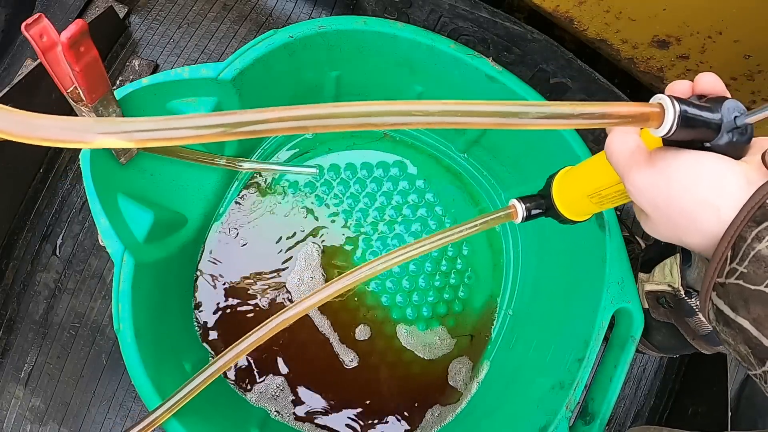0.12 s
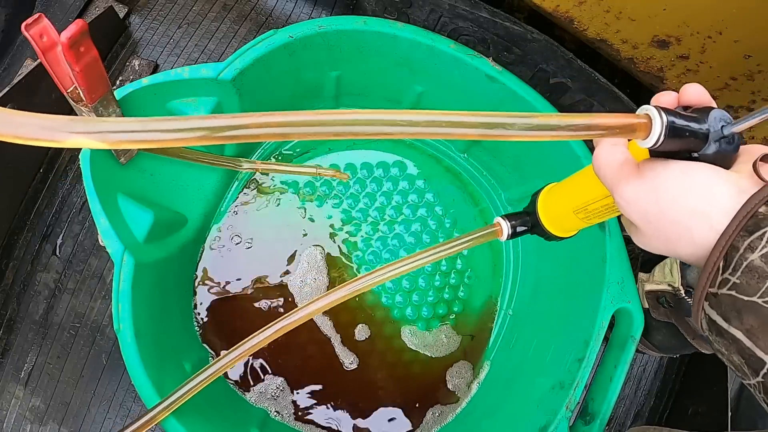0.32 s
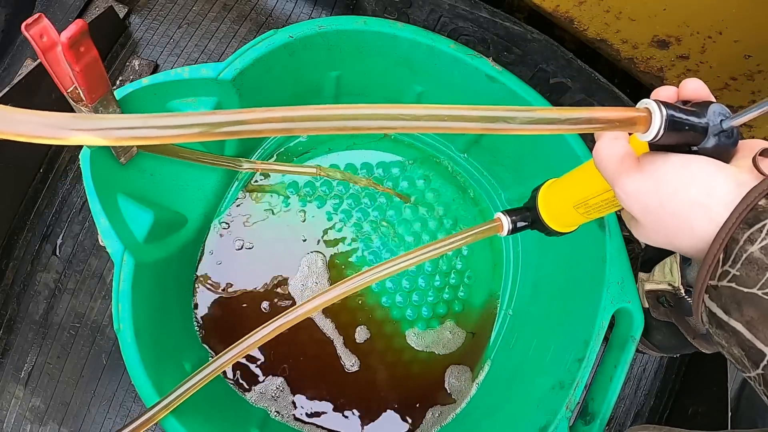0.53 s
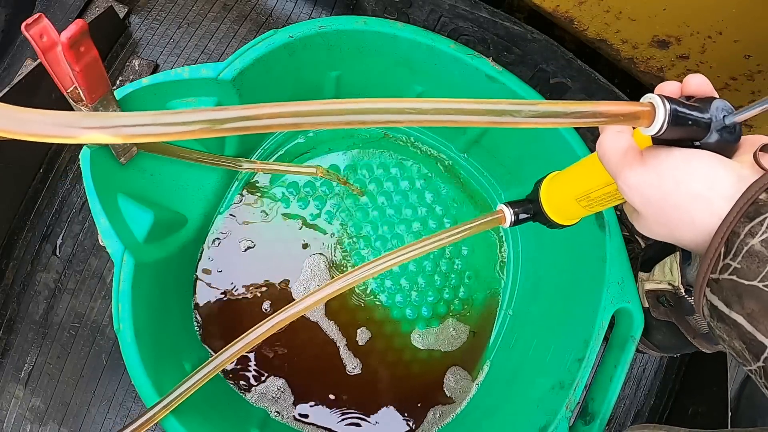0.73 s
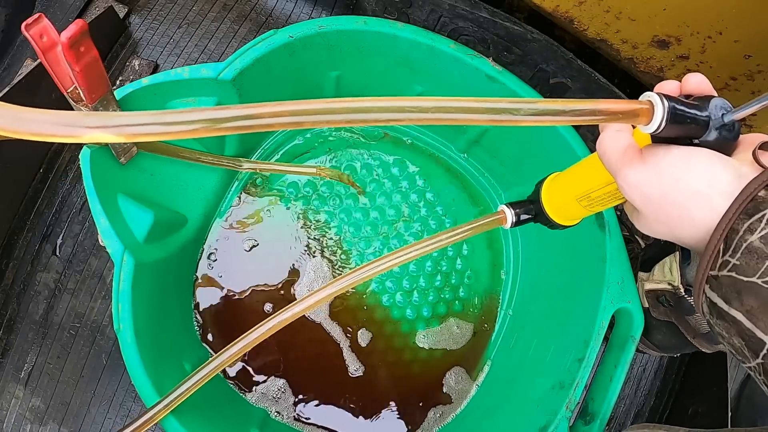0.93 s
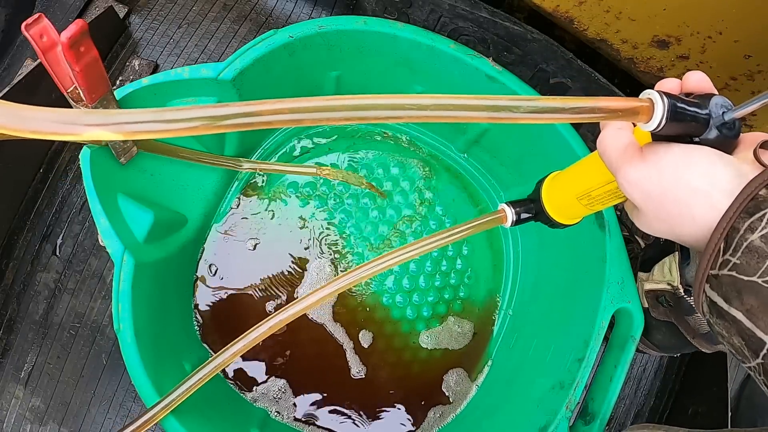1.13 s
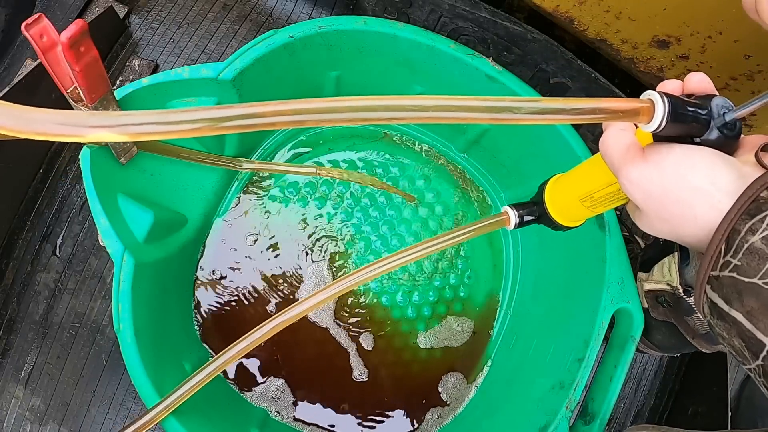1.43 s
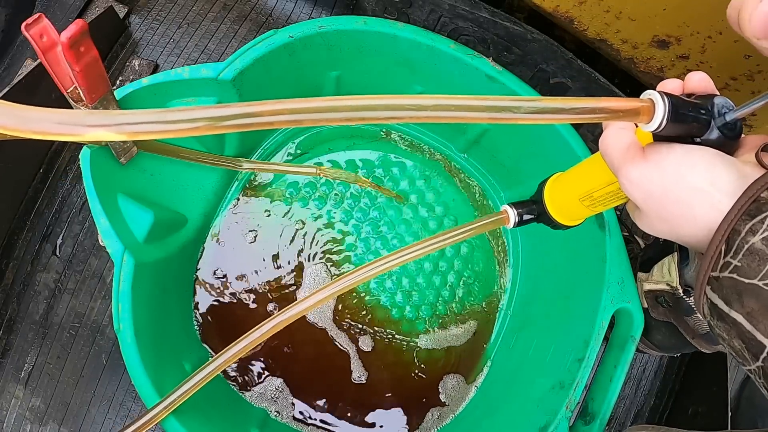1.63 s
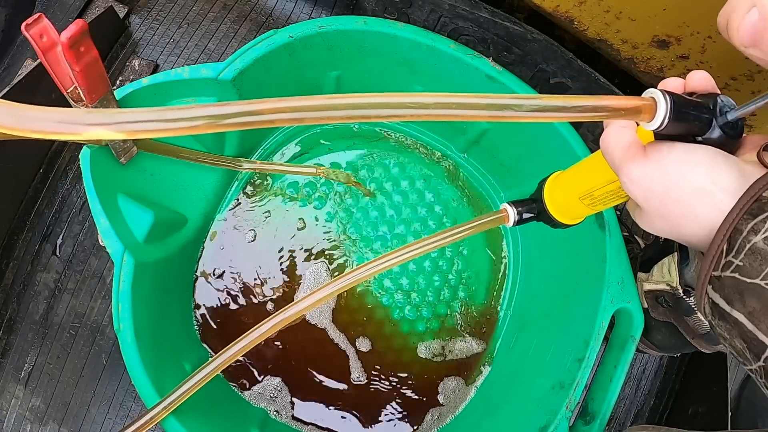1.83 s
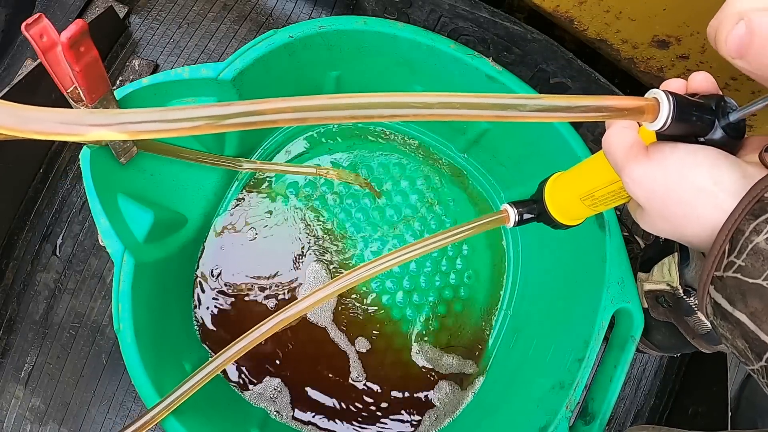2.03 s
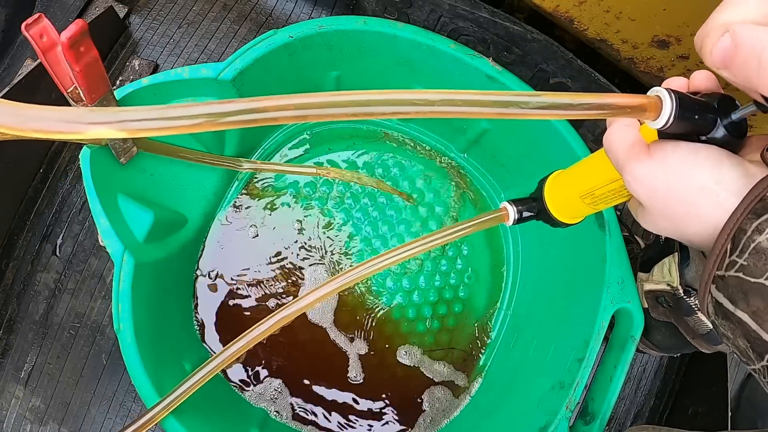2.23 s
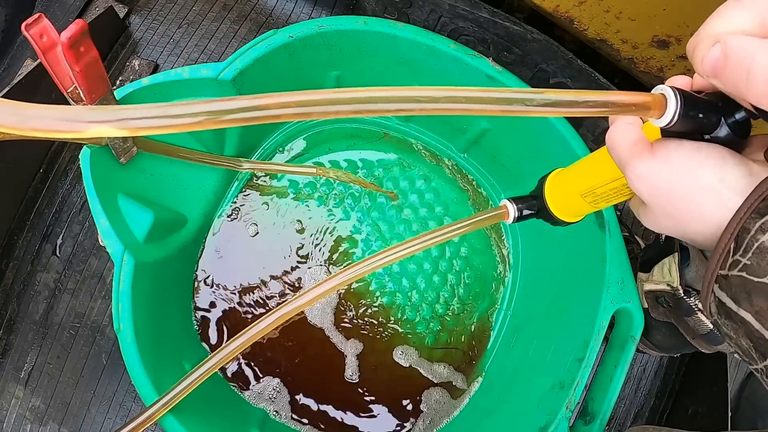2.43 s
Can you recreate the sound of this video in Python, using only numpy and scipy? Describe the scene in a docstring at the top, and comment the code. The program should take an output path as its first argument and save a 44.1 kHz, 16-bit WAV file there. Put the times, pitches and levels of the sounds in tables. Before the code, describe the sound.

A hand siphon pump outdoors, heard close: a brief push hiss ends in one loud plastic knock, two tiny rising slurps follow, then a long airy squeak swoops down and back up over faint air noise.

```python
"""A hand siphon pump squeaks as its pull stroke sucks air through a narrow gap: three wandering breathy
lines of tone and noise, with short broken strands and a rush of air, all coloured by the hose's standing waves.
Before it the push stroke hisses (shaped noise) and ends in a knock (ringing modes and a crack), and the hose
slurps twice (short gliding lines). A low thrum (wavering sine), a drone, outdoor air noise, treble hiss
(all shaped noise) and small ticks (noisy rings) lie under it."""
import sys
import numpy as np
from scipy import signal
from scipy.fft import rfft, irfft, next_fast_len
from scipy.io import wavfile
from scipy.ndimage import uniform_filter1d, map_coordinates

SR = 44100
rng = np.random.default_rng(int(sys.argv[2]) if len(sys.argv) > 2 else 0)


def dump_mix(stems):
    """Bounce the given channels to the path in sys.argv[1] as a 16-bit WAV at rate SR."""
    frames = np.atleast_2d(stems).T  # one column per channel
    limited = np.clip(frames, -1, 1)  # hard clip at full scale
    pcm = np.round(limited * 32767).astype(np.int16)
    wavfile.write(sys.argv[1], SR, pcm)


N = 114660
T = np.arange(N) / SR

# Levels are those of the source, before the hose and the room act on it.
# Outdoor air noise: time_s, level_db; its spectrum: frequency_hz, gain_db
AIR_LEVEL = [(0, -54.5), (.57, -57), (2.6, -58)]
AIR_SPECTRUM = [(160, -8), (280, -2.5), (740, -12.5), (1470, -8), (1650, -5), (3000, -16.5), (3900, -75),
                (6600, -120)]
# Treble hiss: time_s, level_db; its spectrum: frequency_hz, gain_db
TREBLE_LEVEL = [(.215, -73), (.24, -59.5), (.345, -67.5), (.36, -51.5), (.47, -56.5), (.6, -51.5),
                (1.2, -59), (2.6, -76.5)]
TREBLE_SPECTRUM = [(1290, -53), (2200, -5), (6380, 0.5), (14300, -18), (15400, -49)]
# Swells of the low thrum: centre_s, level_db, width_s (from centre to 1/e of the power)
THRUM_SWELLS = [(.27, -32.5, 0.056), (0.439, -34.5, 0.028), (.64, -50, 0.2), (.992, -44.5, 0.019),
                (1.263, -34, 0.02), (1.385, -33.5, 0.02), (1.578, -40, 0.019), (1.698, -38, 0.025),
                (1.88, -47.5, 0.14), (2.471, -47.5, 0.029)]
THRUM_HZ, THRUM_WAVER_HZ, THRUM_REST_DB = 57.9, 3.16, -60
# Spectra of the drone and of its lowest part: frequency_hz, gain_db
DRONE_SPECTRUM = [(53, -20), (90, 6), (97, 1), (129, 0), (214, 2), (275, -19.5), (400, -25.5), (520, -26),
                  (880, -120)]
SUB_SPECTRUM = [(22, -17), (35, -2), (50, 9.5), (120, -72)]
DRONE_DB, SUB_DB = -48.5, -48
DRONE_FOLLOWS = .35  # exponent by which the drone follows the thrum's swells
# Push stroke hiss: time_s, level_db; its spectrum: frequency_hz, gain_db
HISS_LEVEL = [(0, -42), (.12, -38.5), (.195, -37)]
HISS_SPECTRUM = [(350, -33), (939, -31), (1060, -15.5), (1570, -3), (2820, -9.5), (5330, -6), (12900, -23),
                 (15400, -36)]
# Small ticks: start_s, level_db, ring_hz, t60_s, brightness_db (snap against ring)
TICKS = [(0.2032, -27.5, 2297, 0.046, -28), (0.3593, -31, 4170, 0.03, 5), (0.6966, -25, 4378, 0.039, 6.5),
         (0.752, -33, 11700, 0.025, -7), (0.846, -33, 8760, 0.023, 5.5), (1.236, -33.5, 11700, 0.015, 2),
         (1.266, -35, 8440, 0.073, -37), (2.565, -37, 905, 0.017, -3)]
# Ringing modes of the barrel: frequency_hz, level_db, t60_s
BARREL_MODES = [(222, -4.5, 0.19), (262, -8.5, 0.23), (331, -6, 0.1), (458, -5.5, 0.1), (771, -3, 0.11),
                (1037, 12.5, 0.014), (1707, -3.5, 0.051), (2540, 8.5, 0.017), (3540, -2.5, 0.02)]
# Spectrum of the crack: frequency_hz, gain_db
CRACK_SPECTRUM = [(150, 0), (300, 3), (1200, -3.5), (3000, -11), (5500, -24), (9000, -38.5)]
KNOCK_S, KNOCK_DB, RISE_S = .2064, 0, .001
CRACK_DB, CRACK_T60_S = -9, .041
RATTLE_DB, RATTLE_T60_S = -24.5, .28  # level against the crack
# Two short slurps, one line each: time_s, pitch_hz, level_db
SLURPS = [
    [(.392, 3310, -47), (.398, 5030, -21), (.403, 6880, -23.5), (.417, 7360, -56)],
    [(.478, 3370, -45), (.486, 5220, -20), (.5, 7780, -23.5), (.517, 6300, -38), (.568, 6684, -53.5),
     (.585, 7730, -40), (.6, 8650, -57)],
]
# Rush of air with the squeak: time_s, level_db; its spectrum: frequency_hz, gain_db
SUCTION_LEVEL = [(1.1, -63), (1.5, -51), (1.7, -40.5), (2.2, -45.5), (2.6, -51)]
SUCTION_SPECTRUM = [(1900, -15), (2700, -4.5), (5000, -3.5), (7000, 1.5), (9000, -8.5), (13000, -17),
                    (15500, -24)]
# The squeak's lowest, second and third line: time_s, pitch_hz, level_db
SQUEAK_LOW = [(1.196, 5300, -54), (1.204, 5500, -41.5), (1.241, 5337, -42.5), (1.28, 5090, -41.5),
              (1.31, 5360, -41), (1.385, 5920, -45.5), (1.41, 6640, -40.5), (1.445, 5180, -34),
              (1.48, 5650, -43), (1.52, 5416, -38.5), (1.559, 6210, -39.5), (1.584, 5330, -47),
              (1.635, 5575, -35), (1.67, 4920, -40.5), (1.715, 4462, -27.5), (1.741, 4054, -31.5),
              (1.79, 3590, -32.5), (1.87, 3488, -29), (1.894, 3128, -32.5), (1.93, 3144, -36.5),
              (1.965, 2614, -21.5), (2.0, 2370, -33.5), (2.045, 2660, -22.5), (2.08, 2418, -30),
              (2.121, 2770, -26.5), (2.16, 2815, -32), (2.22, 3212, -42), (2.245, 3440, -62),
              (2.28, 4056, -26), (2.305, 4948, -32.5), (2.345, 4937, -33.5), (2.365, 6600, -31),
              (2.395, 6940, -44), (2.42, 6170, -29), (2.456, 8100, -42), (2.49, 7750, -47),
              (2.54, 6145, -36), (2.576, 7000, -45), (2.6, 7900, -50)]
SQUEAK_MID = [(1.511, 7585, -65), (1.56, 7950, -39), (1.591, 6320, -27), (1.63, 7060, -37),
              (1.669, 6320, -36), (1.74, 5410, -33), (1.789, 5196, -32), (1.851, 4920, -35.5),
              (1.878, 4080, -40.5), (1.929, 4245, -34), (1.973, 3614, -37), (2.102, 3696, -36),
              (2.161, 3520, -44), (2.206, 3940, -33), (2.253, 5540, -28), (2.278, 6490, -38),
              (2.33, 6400, -40)]
SQUEAK_HIGH = [(1.878, 5200, -48), (1.922, 5070, -47), (1.952, 5410, -33), (2.0, 4705, -42),
               (2.059, 4655, -35.5), (2.1, 4455, -35), (2.154, 4860, -33), (2.195, 5410, -30.5),
               (2.227, 6020, -37.5)]
LINE_WIDTH_HZ, CLEAN_SHARE = 300, .35  # noise width; share of power in the pure tone
SKIRT_HZ, SKIRT_DB, SLURP_SKIRT_DB = 550, -6.5, -2
FLUTTER_DB = 4  # random level flutter
BREAK_DB = .9  # loss per octave a second of glide
WAVER = .016  # random share of pitch
STRANDS, STRAND_S, STRAND_DB = 300, .045, 1  # count, longest, level over the rush of air
STRAND_OCTAVES = .6  # mean height over the lowest line
STRAND_GLIDE = 2  # steepest glide either way, share of the pitch per second
STRAND_TOP_HZ = 6500  # strands fade above this pitch
HOSE_HZ, HOSE_RETURN = 517.5, .067  # spacing of the favoured pitches; share of the wave sent back
LOCK = .45  # how hard the hose pulls the pitch to its own, 0-1
BODY_HZ, BODY_WIDTH_HZ, BODY_DB = [4900, 6600, 7700], 300, -3  # resonances of the pump body
# Likeness of left and right in noise: frequency_hz, correlation (0-1)
LIKENESS = [(60, 0.99), (140, 0.69), (400, 0.65), (1400, 0.89), (3000, 0.85), (6000, 0.2)]
SQUEAK_ROOM_DB, TICK_ROOM_DB, KNOCK_ROOM_DB, ROOM_T60_S = -8, -12, -33, .21
LEFT_LAG_S = 4e-5
LEFT_TILT_DB = -.24  # the right takes the opposite gain
TOP_HZ, ROLL_HZ = 15450, 14600  # band limit; start of the roll-off under it
DULL_HZ, DULL_DB = 11000, -4  # left channel above this frequency


def amp(db):
    """Amplitude ratio of a level in decibels."""
    return 10 ** (np.asarray(db) / 20)


def unit(x):
    """Normalisation to unit rms."""
    return x / np.sqrt(np.mean(x ** 2) + 1e-20)


def along(points, hz):
    """Linear interpolation of (frequency, value) points on a logarithmic frequency axis."""
    frequency, value = np.transpose(points)
    return np.interp(np.log(hz + 1), np.log(frequency + 1), value)


def colour(points):
    """Spectral envelope: gain as a function of frequency, zero well below the first point."""
    return lambda hz: amp(along(points, hz)) * (hz > .7 * points[0][0])


def level(rows, fade=.008):
    """Amplitude envelope from the last column, with short fades just outside the rows' span."""
    s, db = np.transpose(rows)[[0, -1]]
    edge = np.minimum(T - s[0] + fade, s[-1] + fade - T) / fade
    return amp(np.interp(T, s, db)) * np.clip(edge, 0, 1)


def wobble(rate):
    """Slow random modulation: a smooth curve through random knots, `rate` of them a second."""
    knots = rng.standard_normal(int(N * rate / SR) + 4)
    return map_coordinates(knots, [T * rate])


def filtered(x, response):
    """Linear filtering: the spectrum times a complex frequency response."""
    m = next_fast_len(N + SR // 2)
    return irfft(rfft(x, m) * response(np.fft.rfftfreq(m, 1 / SR)), m)[..., :N]


def rush(spectrum, patchy_db):
    """Turbulence noise of unit rms: random gain patches in time and frequency, partly correlated channels."""
    z = signal.stft(rng.standard_normal((2, N)), nperseg=512)[2]
    field = uniform_filter1d(rng.standard_normal(z.shape[1:]), 6, 0)
    field = uniform_filter1d(field, 8, 1)
    pair = signal.istft(z * amp(patchy_db * unit(field)), nperseg=512)[1][:, :N]

    def mid_side_gain(hz):
        angle = np.arccos(np.clip(along(LIKENESS, hz), -1, 1)) / 2
        return colour(spectrum)(hz) * [np.cos(angle), np.sin(angle)]

    mid, side = filtered(pair, mid_side_gain)
    return unit(np.array([mid + side, mid - side]))


def hose(hz):
    """Standing waves in the hose favour evenly spaced pitches; the pump body adds its resonances."""
    damping = 1j * hz * BODY_WIDTH_HZ
    body = 1 + amp(BODY_DB) * sum(damping / (c * c - hz * hz + damping) for c in BODY_HZ)
    comb = 1 / (1 - HOSE_RETURN * np.exp(-2j * np.pi * hz / HOSE_HZ))
    return body * np.sqrt(1 - HOSE_RETURN ** 2) * comb


def place(x, room_db):
    """Interaural delay and level of the direct sound, plus short reflections drawn anew every 50 ms."""
    sides = np.array([[1], [-1]])  # left, right
    direct = filtered(x, lambda hz: np.exp(-1j * np.pi * hz * LEFT_LAG_S * sides) * amp(LEFT_TILT_DB * sides))
    hop, t = 2205, np.arange(SR // 5) / SR
    padded = np.pad(x, (hop, 2 * hop))
    wet = np.zeros((2, N + SR))
    for i in range(-hop, N, hop):
        tail = rng.standard_normal((2, len(t))) * amp(-60 * t / ROOM_T60_S) * (t > .002)
        piece = padded[i + hop:i + 3 * hop] * np.hanning(2 * hop)
        echo = signal.fftconvolve(piece[None], tail / np.linalg.norm(tail[0]), axes=1)
        wet[:, i + hop:][:, :echo.shape[1]] += echo
    return direct + amp(room_db) * wet[:, hop:hop + N]


def outdoor_air():
    """Broadband noise under slow amplitude modulation."""
    return level(AIR_LEVEL) * amp(1.5 * wobble(23)) * rush(AIR_SPECTRUM, patchy_db=3.0)


def treble_hiss():
    """High-frequency noise under a varying envelope."""
    return level(TREBLE_LEVEL) * rush(TREBLE_SPECTRUM, patchy_db=1.0)


def thrum_and_drone():
    """Amplitude and frequency modulation: a wavering low sine swells, and noise bands swell less with it."""
    power = amp(2 * THRUM_REST_DB)
    for s, db, width in THRUM_SWELLS:
        power = power + amp(2 * db) * np.exp(-((T - s) / width) ** 2)
    pulse = np.sqrt(power)
    pitch = THRUM_HZ + THRUM_WAVER_HZ * wobble(14)
    thrum = np.sqrt(2) * pulse * np.sin(2 * np.pi * np.cumsum(pitch) / SR)
    drone = amp(DRONE_DB + 1.3 * wobble(18)) * rush(DRONE_SPECTRUM, patchy_db=2.0)
    sub = amp(SUB_DB) * rush(SUB_SPECTRUM, patchy_db=5.0)
    return thrum + unit(pulse ** DRONE_FOLLOWS) * (drone + sub)


def ticks():
    """Impulsive excitation of small plastic parts: a decaying noisy ring and a broad snap."""
    out, t = np.zeros(N + SR), np.arange(SR // 10) / SR
    for s, db, hz, t60, bright_db in TICKS:
        noise = rng.standard_normal((2, len(t)))
        ring = unit(uniform_filter1d(noise[0], size=40)) * np.sin(2 * np.pi * hz * t)
        snap = np.diff(uniform_filter1d(noise[1], size=4), prepend=0)
        decay = amp(db - 2.5 - 60 * t / t60)
        out[round(s * SR):][:len(t)] += decay * (ring + amp(bright_db) * snap)
    return out[:N]


def push_hiss():
    """Turbulence noise of the push stroke, rising towards its end."""
    return level(HISS_LEVEL) * rush(HISS_SPECTRUM, patchy_db=0.5)


def knock():
    """Modal impact: the piston hits the end of the barrel, with ringing modes, a crack and its rattle."""
    out, t = np.zeros(N + SR), np.arange(SR // 2) / SR
    noise = unit(filtered(rng.standard_normal(N), colour(CRACK_SPECTRUM))[:len(t)])
    ring = np.zeros(len(t))
    for k, (hz, db, t60) in enumerate(BARREL_MODES):
        ring += (-1) ** k * amp(db - 60 * t / t60) * np.sin(2 * np.pi * hz * t)
    crack = amp(CRACK_DB - 60 * t / CRACK_T60_S)
    rattle = amp(CRACK_DB + RATTLE_DB - 60 * t / RATTLE_T60_S)
    onset = 1 - np.exp(-t / RISE_S)
    blow = (crack + rattle) * noise - ring / np.abs(ring).max()
    out[round(KNOCK_S * SR):][:len(t)] = amp(KNOCK_DB) * onset * blow
    return out[:N]


def suction_rush():
    """Turbulence noise of the indrawn air, filtered by the resonances of hose and body."""
    air = filtered(rush(SUCTION_SPECTRUM, patchy_db=2.0), hose)
    return level(SUCTION_LEVEL) * amp(1.2 * wobble(400)) * air


def phase(rows):
    """Frequency locking: the running phase of a pitch drawn towards multiples of the hose's own."""
    s, hz = np.transpose(rows)[:2]
    free = np.interp(T, s, hz) * (1 + WAVER * wobble(70))
    pull = LOCK * HOSE_HZ * np.sin(2 * np.pi * free / HOSE_HZ)
    return np.cumsum(2 * np.pi * free - pull) / SR


def complex_noise(cutoff_hz):
    """Low-pass complex noise, a band about zero frequency that a carrier can shift."""
    parts = filtered(rng.standard_normal((2, N)), lambda hz: 1 / (1 + (hz / cutoff_hz) ** 4))
    return [1, 1j] @ unit(parts)


def whistle(rows, skirt_db=SKIRT_DB):
    """Noise-modulated carrier: a tone, narrow noise on it and a skirt above, weakened by fast glides."""
    flutter = amp(FLUTTER_DB * wobble(50.13))
    tone = np.sqrt(2 * CLEAN_SHARE)
    breath = np.sqrt(1 - CLEAN_SHARE) * complex_noise(LINE_WIDTH_HZ / 2)
    skirt = amp(skirt_db) * complex_noise(SKIRT_HZ) * np.exp(2j * np.pi * SKIRT_HZ * T)
    s, hz = np.transpose(rows)[:2]
    octaves_per_s = np.gradient(np.log2(np.interp(T, s, hz)), T)
    glide = uniform_filter1d(np.abs(octaves_per_s), size=300)
    line = np.real((flutter * (tone + breath) + skirt) * np.exp(1j * phase(rows)))
    return level(rows) * amp(-np.minimum(BREAK_DB * glide, 20)) * line


def slurps():
    """Short gliding carriers with a strong noise skirt, before the hose acts."""
    return sum(whistle(rows, SLURP_SKIRT_DB) for rows in SLURPS)


def strands():
    """Random superposition of short chirps above the lowest line, under the rush's envelope."""
    when, height, slope, length, size = rng.random((STRANDS, 5)).T[..., None]
    t = np.arange(round(STRAND_S * SR)) / SR
    s, hz, _ = np.transpose(SQUEAK_LOW)
    start = s[0] + when * (s[-1] - s[0] - STRAND_S)
    # exponentially distributed height in octaves
    pitch = np.interp(start, s, hz) * 2 ** (-STRAND_OCTAVES * np.log(1 - height))
    shape = np.sin(np.pi * np.minimum(2 * t / (STRAND_S * (1 + length)), 1)) ** 2
    cycles = pitch * t * (1 + STRAND_GLIDE * (slope - .5) * t)
    chirps = size ** 2 * shape * np.sin(2 * np.pi * cycles)
    chirps = chirps / (1 + (pitch / STRAND_TOP_HZ) ** 10)
    at = (start * SR).astype(int) + np.arange(len(t))
    scatter = np.bincount(at.ravel(), chirps.ravel(), N)[:N]
    return amp(STRAND_DB) * level(SUCTION_LEVEL) * unit(scatter)


def squeak():
    """Air forced through a narrow gap whistles: three breathy lines and broken strands, before the hose acts."""
    return strands() + sum(whistle(rows) for rows in [SQUEAK_LOW, SQUEAK_MID, SQUEAK_HIGH])


def scene():
    """Superposition of the background, the push stroke, the slurps and the pull stroke."""
    background = outdoor_air() + treble_hiss() + thrum_and_drone()
    impacts = place(ticks(), TICK_ROOM_DB) + place(knock(), KNOCK_ROOM_DB)
    airflow = push_hiss() + suction_rush()
    whistles = place(filtered(slurps() + squeak(), hose), SQUEAK_ROOM_DB)
    return background + impacts + airflow + whistles


def record(dry):
    """Band limitation: a steep roll-off and a cut at the top; the left channel is duller."""
    def response(hz):
        dulling = amp(np.outer([DULL_DB, 0], hz > DULL_HZ))
        return dulling * (hz < TOP_HZ) / (1 + (hz / ROLL_HZ) ** 16)

    return filtered(dry, response)


dry = scene()
out = record(dry)
dump_mix(out)
```